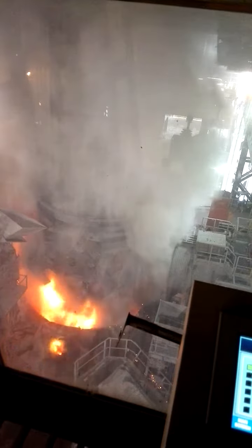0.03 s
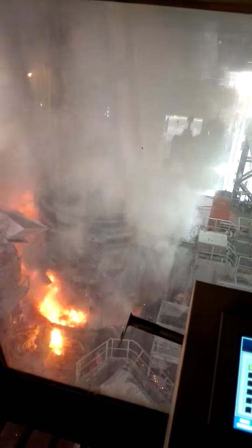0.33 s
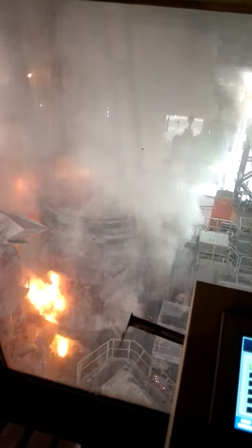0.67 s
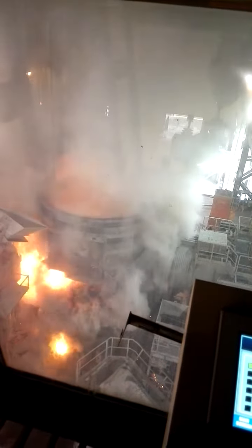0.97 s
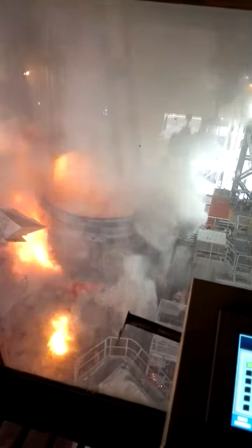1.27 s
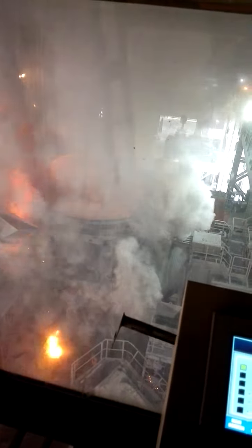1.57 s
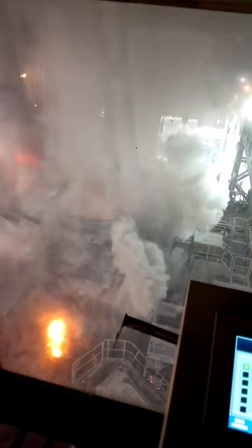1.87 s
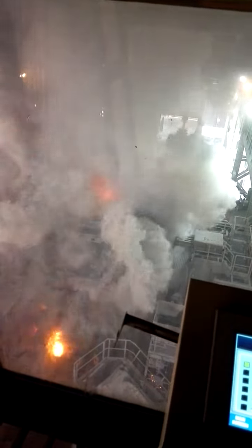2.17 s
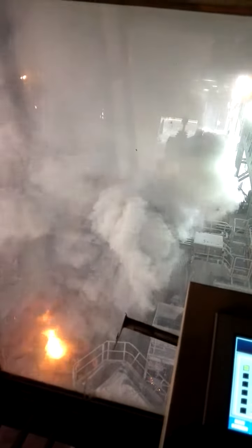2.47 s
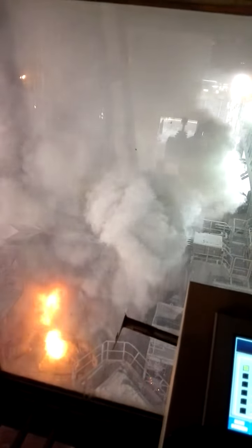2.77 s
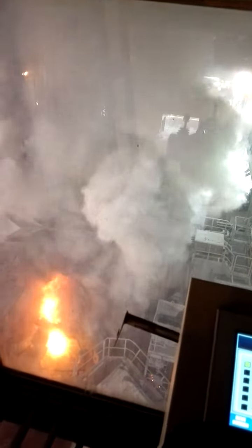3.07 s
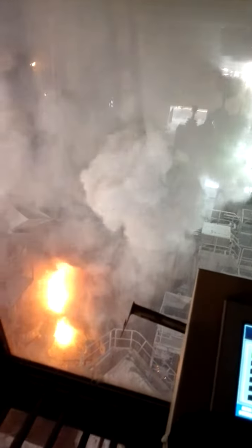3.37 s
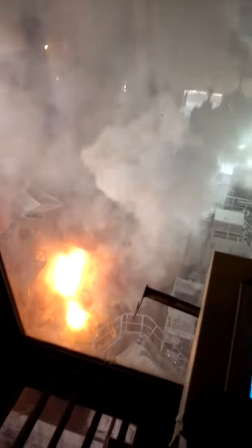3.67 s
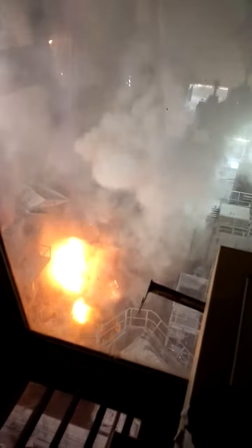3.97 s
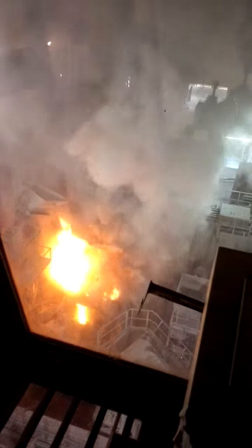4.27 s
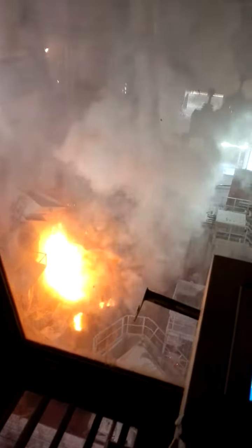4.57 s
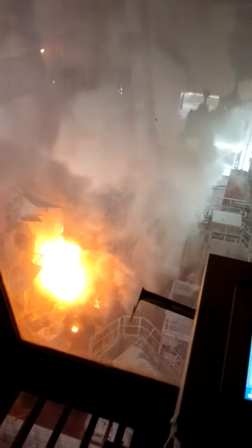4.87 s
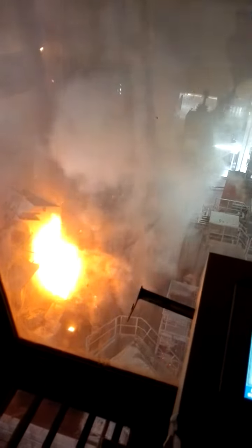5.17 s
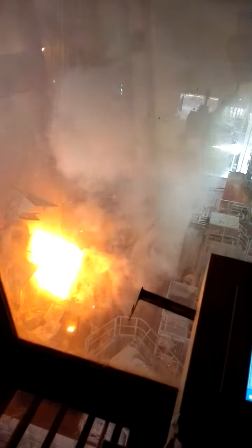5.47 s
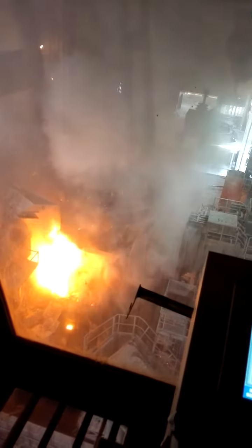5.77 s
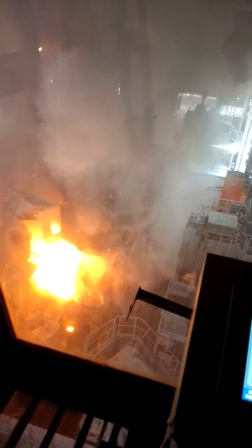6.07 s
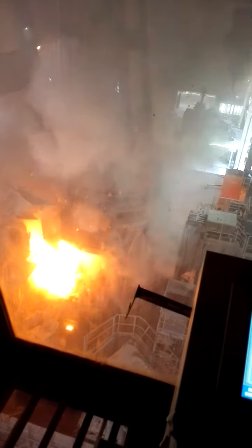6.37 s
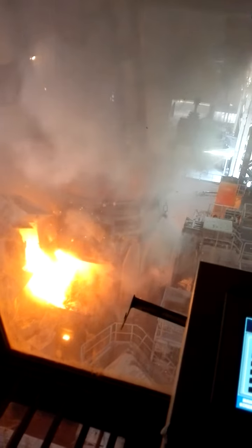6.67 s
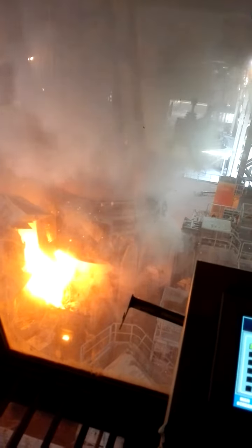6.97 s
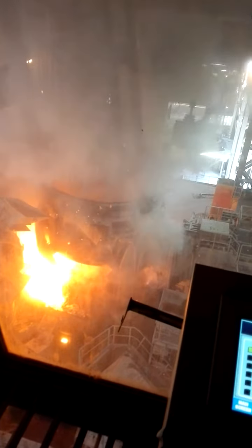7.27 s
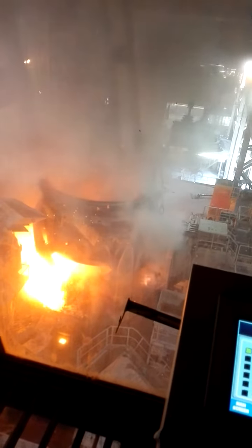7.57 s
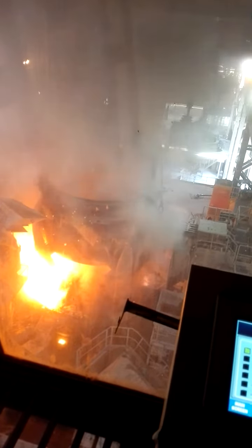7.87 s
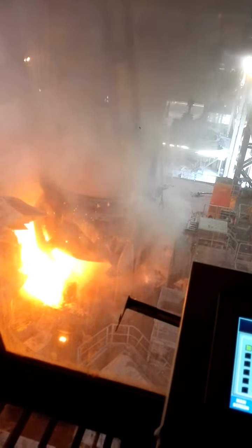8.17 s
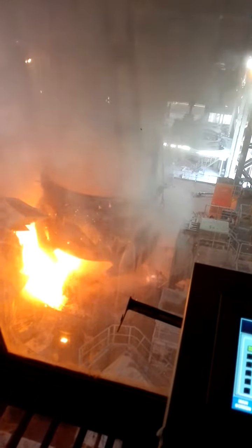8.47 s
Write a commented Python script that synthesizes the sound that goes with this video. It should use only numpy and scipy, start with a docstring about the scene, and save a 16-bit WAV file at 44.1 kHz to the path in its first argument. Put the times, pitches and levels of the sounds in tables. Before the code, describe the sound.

Heard from a closed cab, a clattering rush of scrap metal swells and runs out, leaving a deep furnace roar and steady rushing air.

```python
"""Charging a steel furnace, heard from a closed crane cab

Scrap slides into the burning furnace: countless steel impacts, smeared by a big hall, merge into a rush
that swells, peaks and runs out, with scrapes and thuds. The fire roars on and makes the cab boom and drone.
Air rushes steadily through the cab's resonances, a machine whines faintly and gas hisses once."""
import sys
import numpy as np
from scipy import signal
from scipy.fft import rfft, irfft, next_fast_len
from scipy.io import wavfile
from scipy.ndimage import uniform_filter1d, map_coordinates

SR = 44100
rng = np.random.default_rng(int(sys.argv[2]) if len(sys.argv) > 2 else 0)


def pcm_store(signal):
    """Save signal as 16-bit PCM."""
    levels = np.round(np.clip(np.atleast_2d(signal), -1, 1) * 32767)
    wavfile.write(sys.argv[1], SR, levels.astype(np.int16).T)


N = 375291

# strength of the fire: t/s, level/dB
FIRE_LEVEL = [(0, -25), (1.25, -28), (1.7, -30.5), (2.5, -32), (3.2, -29), (4.2, -29), (5.4, -29),
              (7.7, -28.5), (8.51, -29.5)]
# flares that thump the cab: t/s, boom/dB, whump/dB, fall/(dB/s)
FLARES = [(0.35, -31, -30, 120), (0.62, -28.5, -32, 100), (0.86, -28.5, -35, 176), (1.06, -24, -31, 45),
          (1.31, -38, -30, 65), (1.73, -39, -29, 150), (1.87, -29, -29, 112), (2.37, -34, -34, 130),
          (2.94, -35, -27.5, 101), (3.12, -29, -39, 120), (3.41, -28.5, -37, 25), (3.92, -34, -29.5, 116),
          (4.17, -30, -37, 48), (4.6, -34, -31, 140), (4.8, -29.5, -40, 90), (5.13, -27, -27.5, 280),
          (5.53, -28, -37, 110), (5.83, -28, -35, 110), (6.09, -32, -28.5, 133), (6.44, -24.5, -41, 100),
          (7.09, -29, -37, 90), (7.53, -28.5, -36, 120), (7.72, -31, -38, 60), (7.88, -26.5, -35, 154),
          (8.32, -33.5, -41, 100), (8.42, -37, -24, 130)]
# low resonances of the cab: f/Hz, width/Hz, gain/dB
CAB_MODES = [(19.9, 7.3, 5.5), (31.1, 7.6, 13.5), (75.3, 13.4, 6), (106, 12.4, 3.5), (158.3, 7.1, 12),
             (182, 13, -0.5), (188.3, 14, 13.5), (199.6, 16.6, 5.5), (228, 26, 4), (252, 21.4, 7.5),
             (271, 11.6, 2), (289, 12, 6), (331.6, 12, 8.5), (339, 18, 1), (406, 11, 0), (442, 22, 3),
             (451.6, 77, 8)]
# colour of the finest splinters and sparks: f/Hz, level/dB
FIZZ_COLOUR = [(2500, -22), (5000, -4), (7500, 0.5), (10500, 4.5), (12000, 0), (14000, -13)]


def scrap():
    """Thousands of steel impacts merge into a rush; the heavy mass tumbles into the vessel below it."""
    # colour of the clatter: f/Hz, level/dB
    clatter_colour = [(150, -22), (330, -2), (550, 0.5), (800, 0.5), (1250, -0.5), (1750, 2), (2500, 0.5),
                      (3000, -5.5), (4800, -8), (6300, -14), (7300, -16), (10300, -40), (14000, -44)]
    # ring of the pieces and the chute: f/Hz, width/Hz, gain/dB
    steel_modes = [(784, 72, 3.5), (1113, 62, 4), (1386, 68, 2), (1670, 130, 0.5), (1950, 54, -1.5),
                   (2176, 33, -9), (2560, 110, -1)]
    # colour of the tumbling mass: f/Hz, level/dB
    tumble_colour = [(30, -30), (70, -7), (130, -1.5), (180, -8), (250, -0.5), (310, -8), (450, -12),
                     (900, -35.5)]
    flow_db, treble_db, t = flow(treble=False), flow(treble=True), np.arange(N) / SR
    wash = patchy(hall(impacts(rate=2500, spread_db=4), t60=1.9), depth_db=1.0)
    clatter = in_cab(wash, clatter_colour, steel_modes)
    body = filtered(clatter, lambda hz: 1 / (1 + (hz / 2800) ** 6))  # low-pass
    rush = amp(flow_db) * body + amp(treble_db) * (clatter - body)
    tumble = amp(0.83 * flow_db - 9.5) * in_cab(noise(), tumble_colour, CAB_MODES)
    # the top end barely lingers in the hall: it leads the rush and grows faster with the flow
    ahead_db = np.interp(t + .03, t, treble_db)
    splinters = in_cab(hall(impacts(rate=1500, spread_db=1.0), t60=0.19), FIZZ_COLOUR)
    return rush + tumble + amp(1.115 * ahead_db - 20.5 + 0.4 * wobble(28)) * splinters


def flow(treble):
    """Level of the scrap's body or treble in dB: a slide gathers, gushes and runs out ever faster."""
    # gushes on top of the slide: t/s, peak/dB, rise/(dB/s), fall/(dB/s), extra treble/dB
    gushes = [(0.27, -35.5, 39, 31, 6.5), (0.95, -29, 24, 29, 3), (1.15, -23, 31, 23, -0.5),
              (1.39, -20.5, 68, 47, 2), (1.455, -21, 85, 40, 1), (2.07, -27.5, 70, 28, 1),
              (2.29, -32, 152, 53, 0), (2.6, -42, 170, 70, -1), (2.74, -44, 170, 60, 5),
              (2.96, -39, 120, 60, 3.5), (3.11, -42, 142, 58, 4.5), (3.33, -44.5, 88, 39, -4)]
    past_crest_s = np.arange(N) / SR - 1.03
    slide = amp(-29 + 0.6 * np.minimum(past_crest_s, 0) - 3 * np.maximum(past_crest_s, 0) ** 2)
    surges = [swell(s, db + treble * bright_db, rise, fall) for s, db, rise, fall, bright_db in gushes]
    return 20 * np.log10(together([slide] + surges) + 1e-12)


def scrapes():
    """Single pieces scrape and ring out of the rush, each with a rough, sinking pitch."""
    # scraping pieces: t/s, peak/dB, f/Hz
    pieces = [(1.448, -23, 1693), (2.075, -34, 2030), (2.113, -43, 1560), (2.288, -33, 1402),
              (3.089, -42, 1540)]
    sag_hz_per_s = 2300
    out, t = np.zeros((2, N)), np.arange(N) / SR
    for s, db, hz in pieces:
        pitch = hz - sag_hz_per_s * np.clip(t - s, -.1, .1)
        out += swell(s, db, rise=400, fall=199) * wide_tone(pitch, wander_hz=44.9, rate=250)
    return out


def thuds():
    """Heavy lumps land in the vessel with short, dull blows."""
    # landings: t/s, peak/dB, fall/(dB/s)
    landings = [(1.04, -21, 382), (1.17, -26.5, 90), (1.402, -26.5, 202), (1.57, -28.5, 92),
                (1.61, -27.5, 260), (1.99, -31.5, 148), (2.96, -36.5, 74)]
    # colour of a blow: f/Hz, level/dB
    lump_colour = [(40, -23), (110, -14), (185, 2), (265, -1.5), (330, -5), (500, -17), (1000, -45.5)]
    blows = [swell(s, db, rise=902, fall=fall) for s, db, fall in landings]
    return together(blows) * in_cab(noise(), lump_colour)


def fire():
    """Combustion noise roars through the cab's modes; each flare pushes a dull whump of air."""
    # colour of the roar: f/Hz, level/dB
    roar_colour = [(8, -22), (16, -3.5), (45, -0.5), (90, 1), (135, -6.5), (200, -13), (280, -11),
                   (400, -13), (600, -23), (1500, -47.5)]
    # colour of a whump: f/Hz, level/dB
    whump_colour = [(18, -13), (32, 6.5), (50, -5), (90, -9.5), (160, -26), (500, -61)]
    burning = amp(curve(FIRE_LEVEL) - 0.86 + 0.54 * wobble(6.5))
    roar = burning * in_cab(noise(), roar_colour, CAB_MODES)
    pushes = [swell(s, db, rise=193, fall=fall) for s, _, db, fall in FLARES]
    return roar + together(pushes) * in_cab(noise(), whump_colour)


def cab_boom():
    """The fire and its flares shake a deep mode of the cab; a higher one booms at first, then dies away."""
    fire_db = curve(FIRE_LEVEL)
    boom_db = fire_db.mean() + 1.1 * (fire_db - fire_db.mean()) - 9  # swings wider than the fire
    shaking = amp(boom_db) * throb(depth=0.61, rate=12)
    thumps = [swell(s, db, rise=193, fall=fall) for s, db, _, fall in FLARES]
    deep = together([shaking] + thumps) * wavering(60.44, wander_hz=1.7, rate=9)
    fading = swell(0, -36.5, rise=0, fall=27, hold_s=1) * throb(depth=0.99, rate=8.2)
    return deep + fading * wavering(78.0, wander_hz=2.0, rate=9.5)


def cab_drone():
    """A cab mode driven by the fire stands out as a throbbing drone that swells now and then."""
    # swells of the drone: t/s, hold/s, level/dB
    drone_swells = [(0.07, 0.018, -33), (0.516, 0.33, -30.5), (1.257, 0.17, -27.3), (1.772, 0.62, -34),
                    (3.073, 0.14, -34), (3.384, 0.41, -36.5), (4.66, 0.17, -36.5), (5.335, 0.096, -32),
                    (5.586, 0.095, -30), (6.255, 0.12, -34), (6.646, 0.24, -33.5), (7.45, 0.13, -36),
                    (8.07, 0.14, -37)]
    swells = [swell(s, db, rise=100, fall=100, hold_s=hold) for s, hold, db in drone_swells]
    bed = amp(curve(FIRE_LEVEL) - 12) * throb(depth=1.0, rate=14)
    droning = together([bed] + swells) * throb(depth=0.55, rate=22)
    return droning * wavering(173.7, wander_hz=3.04, rate=18)


def sparks():
    """Sparks sizzle faintly on top of the fire, creeping up in level."""
    creep = swell(9.9, -56, rise=0.5, fall=0)
    return creep * in_cab(hall(impacts(rate=700, spread_db=-0.5), t60=.2), FIZZ_COLOUR)


def rushing_air():
    """A steady bed of turbulent air, coloured by the cab's resonances."""
    # colour of the airflow: f/Hz, level/dB
    air_colour = [(150, -26), (300, -2), (480, -2), (700, -1), (1000, -4), (1170, -7.5), (1600, -5),
                  (2400, -8.5), (3000, -10.5), (5000, -13.5), (7000, -18), (10000, -27), (14000, -25.5)]
    # resonances the air excites: f/Hz, width/Hz, gain/dB
    air_modes = [(470, 7.9, 7), (515, 22, -1), (563, 12, 9), (594, 18, 7), (738, 30, 0.5), (786, 20, 9),
                 (860, 20, 0), (937, 34, 6.5), (1041, 54, 6), (1290, 50, 7), (1560, 80, 3), (1760, 18, 7),
                 (2080, 170, 2), (2500, 150, 4), (3280, 110, 2), (3460, 50, 3), (3566, 22, 8),
                 (3980, 43, 0), (4870, 430, 2.5)]
    return amp(-37.5) * in_cab(patchy(noise(), depth_db=0.56), air_colour, air_modes)


def machine_whine():
    """A machine starts and holds a faint, unsteady whine; a higher note joins in when it swells."""
    # swells of the whine: t/s, hold/s, main note/dB, higher note/dB
    whine_swells = [(3.05, 0.06, -49, -62), (3.38, 0.08, -49, -64), (4.52, 0.15, -50, -60),
                    (5.27, 0.13, -45, -52.5), (6.447, 0.18, -50, -58), (7.5, 0.18, -44, -51),
                    (7.92, 0.24, -47.5, -62)]
    running = swell(3.3, -49, rise=31, fall=0) * throb(depth=0.45, rate=4.6)
    swells = [swell(s, db, rise=71, fall=71, hold_s=hold) for s, hold, db, _ in whine_swells]
    upper_swells = [swell(s, db, rise=71, fall=71, hold_s=hold) for s, hold, _, db in whine_swells]
    whine = together([running] + swells) * wide_tone(938, wander_hz=11, rate=50)
    upper = together(upper_swells) * wide_tone(1037, wander_hz=16.1, rate=70)
    return amp([[-3], [1.5]]) * (whine + upper)  # panned right


def gas_puff():
    """A brief jet of gas hisses."""
    # colour of the jet: f/Hz, level/dB
    gas_colour = [(1500, -17), (4000, 2.5), (6000, -5), (7500, 4), (10500, -9), (14000, -17)]
    return swell(5.86, -44, rise=244, fall=75) * in_cab(noise(), gas_colour)


def hall(x, t60, places=24):
    """The hall smears blows into a tail that differs with each place of impact and each side; rms 1."""
    decay = amp(-60 * np.arange(SR) / SR / t60)
    out = np.zeros((2, N + SR))
    for part in np.array_split(np.arange(N), places):
        tail = rng.standard_normal((2, SR)) * decay
        out[:, part[0]:part[-1] + SR] += signal.fftconvolve(x[part][None], tail, axes=1)
    out[:, :SR] += out[:, N:]  # the hall is already ringing at the start
    return unit(out[:, :N])


def in_cab(pair, spectrum, modes=()):
    """Two unrelated signals become a coloured, diffuse stereo field in the cab; rms 1."""
    # stereo image, mono in the bass and wide above: f/Hz, left-right correlation
    likeness = [(60, .999), (140, 0.97), (210, 0.97), (300, 0.7), (390, -0.11), (550, -0.35), (720, -0.33),
                (850, -0.22), (1150, 0.013), (1320, 0.41), (1750, 0.16), (1950, 0.0097), (14000, -0.014)]

    def mid_side_gains(hz):
        angle = np.arccos(np.clip(along(likeness, hz), -1, 1)) / 2
        colour = amp(along(spectrum, hz)) * resonances(modes, hz)
        return colour * np.array([np.cos(angle), np.sin(angle)])

    mid, side = filtered(pair, mid_side_gains)
    return unit(filtered(np.array([mid + side, mid - side]), lean))


def lean(hz):
    """Gain of each side: long waves reach both alike, treble favours the right."""
    # balance: f/Hz, left minus right/dB
    balance = [(370, -1), (670, 2), (1150, -1), (1650, -3), (2350, -2.6), (2850, -1.3), (4100, -3.5),
               (7500, -2), (13800, -0.5)]
    shading_db = along(balance, hz) * hz ** 2 / (hz ** 2 + 300 ** 2)
    return amp(np.outer([.5, -.5], shading_db))


def resonances(modes, hz):
    """Gain of resonant peaks standing on a flat response."""
    return amp(sum(db / (1 + (2 * (hz - centre) / width) ** 2) for centre, width, db in modes))


def patchy(x, depth_db):
    """Turbulence: patches of a stereo pair come and go in time and frequency."""
    spectra = signal.stft(x, nperseg=1024)[2]
    patches = uniform_filter1d(rng.standard_normal(spectra.shape[1:]), size=7, axis=0)
    patches = uniform_filter1d(patches, size=9, axis=1)
    return signal.istft(spectra * amp(depth_db * unit(patches)), nperseg=1024)[1][:, :N]


def impacts(rate, spread_db):
    """Random blows of scattered sizes, rate a second."""
    hits = rng.random(N) < rate / SR
    return hits * rng.standard_normal(N) * amp(spread_db * rng.standard_normal(N))


def noise():
    """White noise, unrelated left and right."""
    return rng.standard_normal((2, N))


def wavering(centre_hz, wander_hz, rate):
    """A tone of rms 1 whose pitch wanders at random, rate turns a second."""
    pitch = centre_hz + wander_hz * wobble(rate)
    return np.sqrt(2) * np.sin(2 * np.pi * np.cumsum(pitch) / SR)


def wide_tone(centre_hz, wander_hz, rate):
    """A tone that wavers separately on each side."""
    return np.array([wavering(centre_hz, wander_hz, rate) for _ in range(2)])


def throb(depth, rate):
    """Random beating of a mode shaken by noise: a gain of rms 1."""
    return unit(1 + depth * np.tanh(wobble(rate)))


def wobble(rate):
    """A smooth random curve, rate turns a second."""
    return map_coordinates(rng.standard_normal(1024), [np.arange(N) * rate / SR], mode="mirror")


def swell(at_s, peak_db, rise, fall, hold_s=0):
    """Envelope that rises to a peak, holds and falls, slopes in dB/s; with no fall it sustains."""
    t = np.arange(N) / SR - at_s
    return amp(peak_db + np.minimum(np.minimum(rise * t, -fall * (t - hold_s)), 0))


def together(gains):
    """Gain of unrelated sounds whose powers add."""
    return np.sqrt(np.sum(np.square(gains), axis=0))


def filtered(x, response):
    """x shaped by a gain that depends on frequency."""
    size = next_fast_len(N + SR // 2)
    return irfft(rfft(x, size) * response(np.fft.rfftfreq(size, 1 / SR)), size)[..., :N]


def along(points, hz):
    """(f/Hz, value) points read on a log axis."""
    freqs, values = np.transpose(points)
    return np.interp(np.log(hz + 1), np.log(freqs + 1), values)


def curve(rows):
    """(t/s, value) rows as one value per sample."""
    return np.interp(np.arange(N) / SR, *np.transpose(rows))


def amp(db):
    """Decibels to gain."""
    return 10 ** (np.asarray(db) / 20)


def unit(x):
    """Scaled to rms 1."""
    return x / np.sqrt(np.mean(x ** 2) + 1e-20)


def scene():
    """Everything that reaches the cab."""
    charge = scrap() + scrapes() + thuds()
    furnace = fire() + cab_boom() + cab_drone() + sparks()
    return charge + furnace + rushing_air() + machine_whine() + gas_puff()


def record(dry):
    """A steep notch in the treble and a hard cut at the top."""
    notch_hz, half_width_hz, top_hz = 8570, 952, 14300
    notch = lambda hz: 1 - 1 / (1 + ((hz - notch_hz) / half_width_hz) ** 12)
    return filtered(dry, lambda hz: notch(hz) * (hz < top_hz))


dry = scene()
out = record(dry)
pcm_store(out)
```